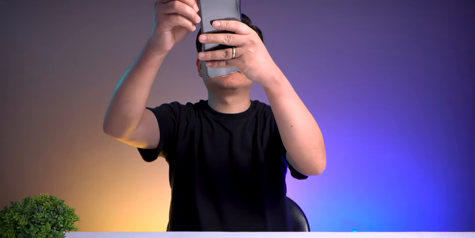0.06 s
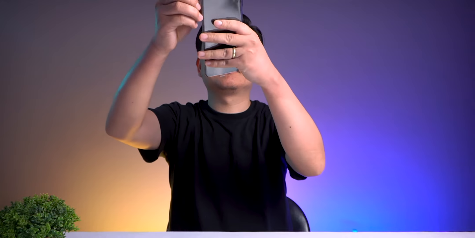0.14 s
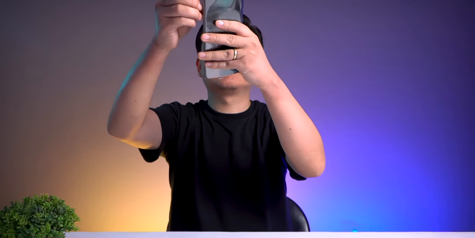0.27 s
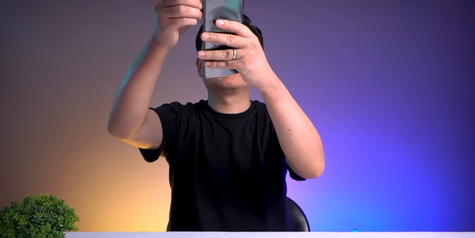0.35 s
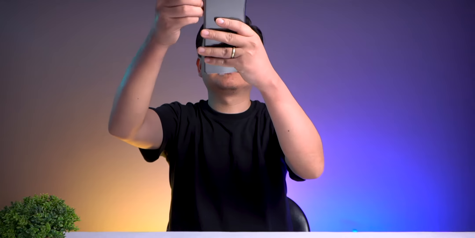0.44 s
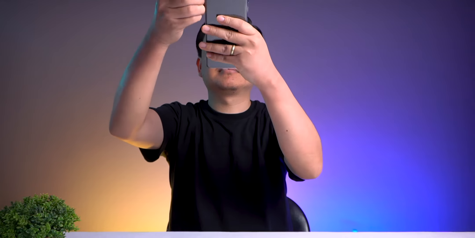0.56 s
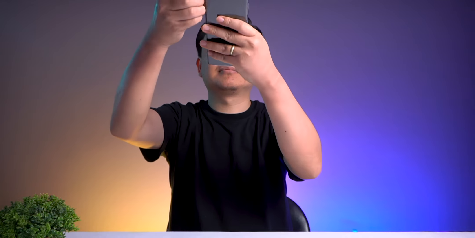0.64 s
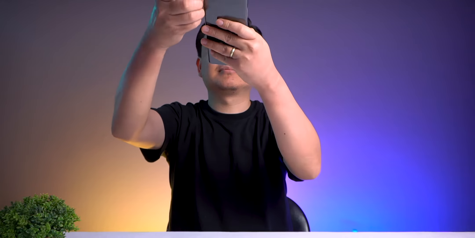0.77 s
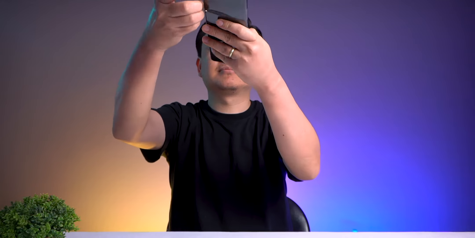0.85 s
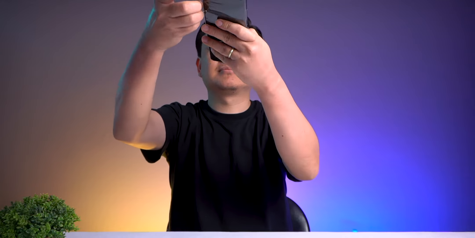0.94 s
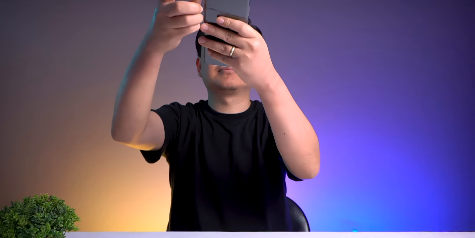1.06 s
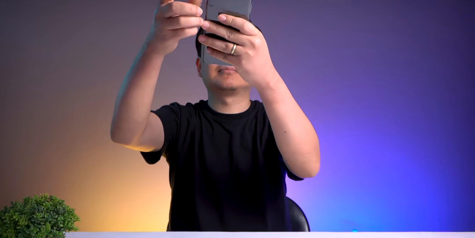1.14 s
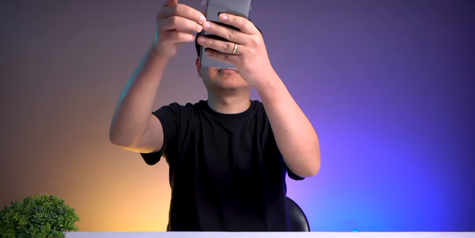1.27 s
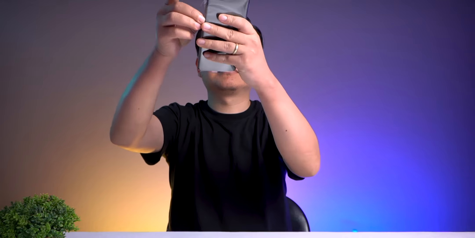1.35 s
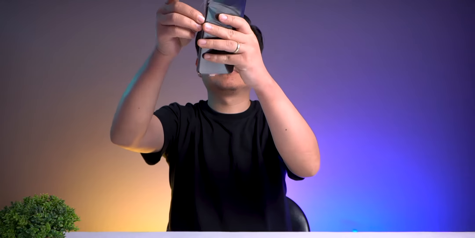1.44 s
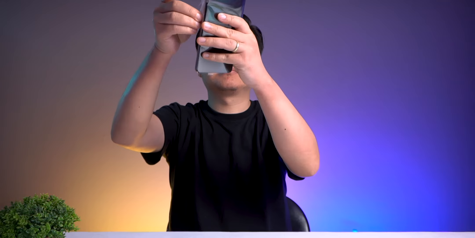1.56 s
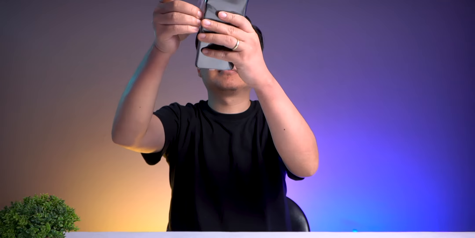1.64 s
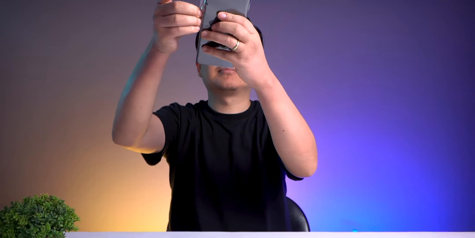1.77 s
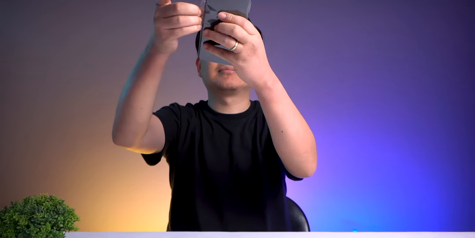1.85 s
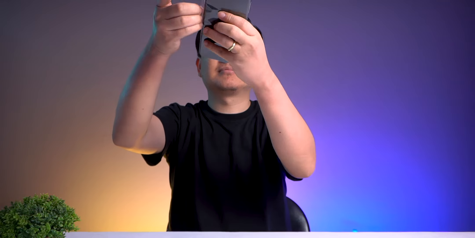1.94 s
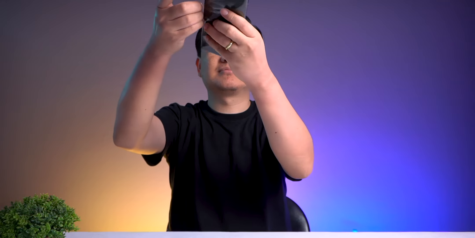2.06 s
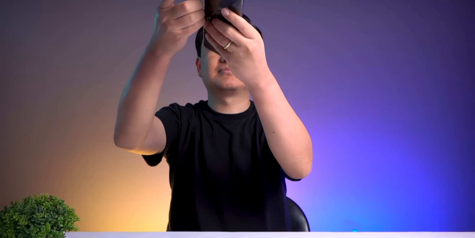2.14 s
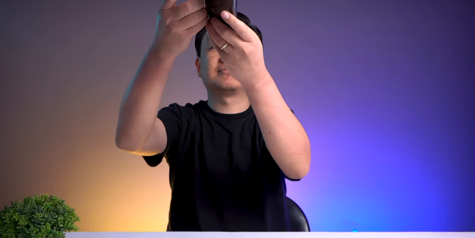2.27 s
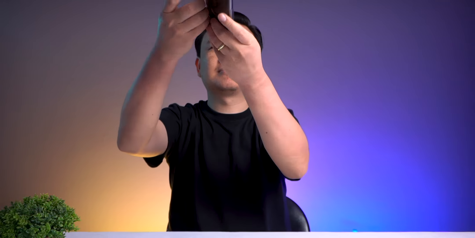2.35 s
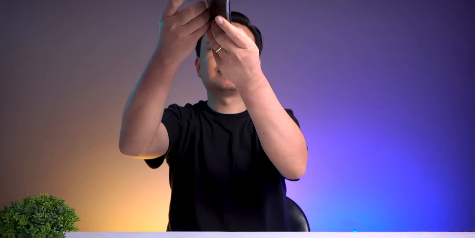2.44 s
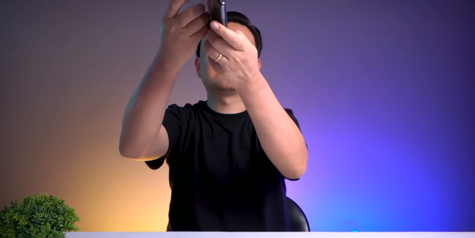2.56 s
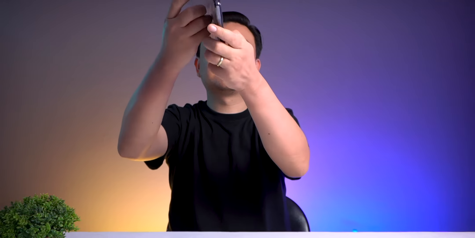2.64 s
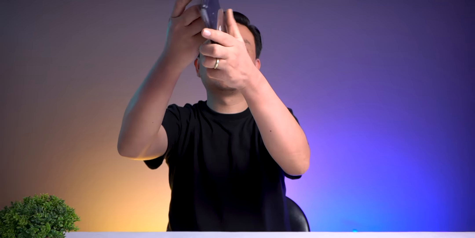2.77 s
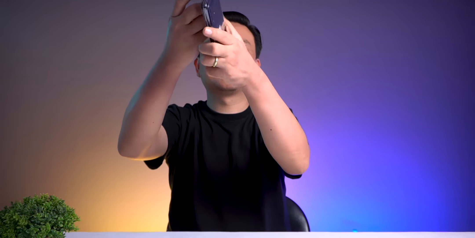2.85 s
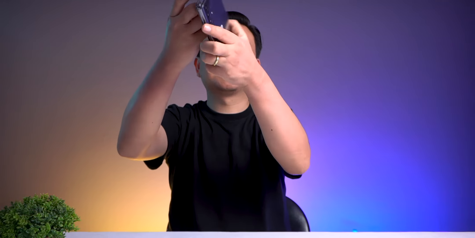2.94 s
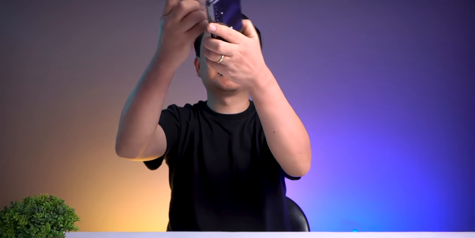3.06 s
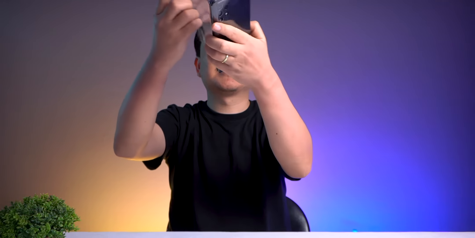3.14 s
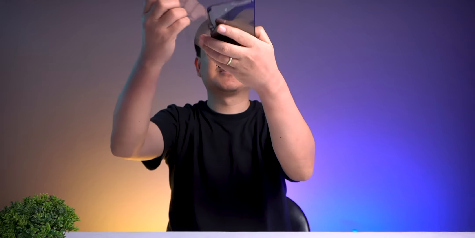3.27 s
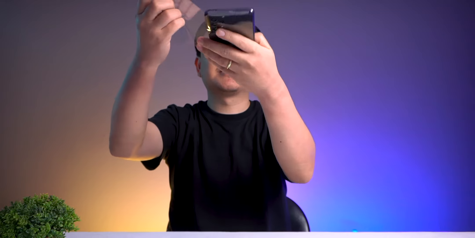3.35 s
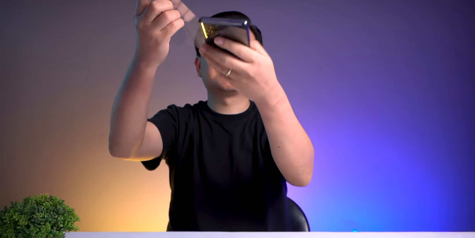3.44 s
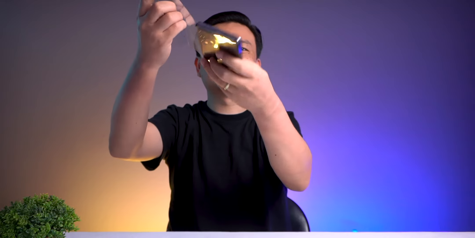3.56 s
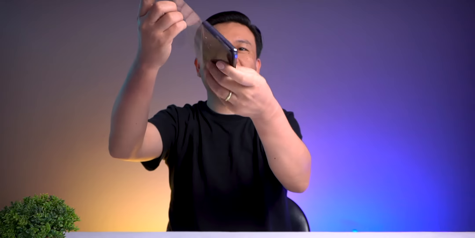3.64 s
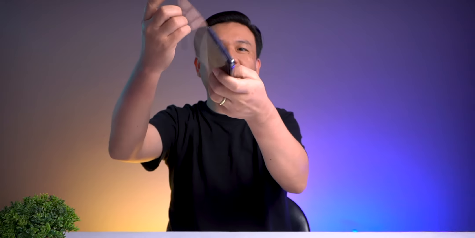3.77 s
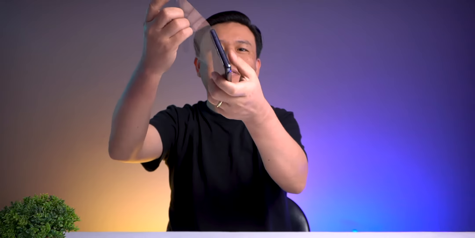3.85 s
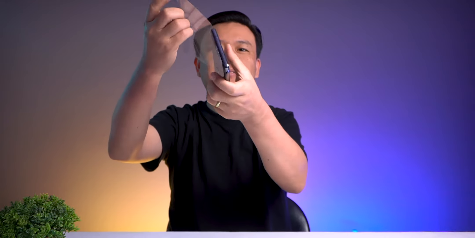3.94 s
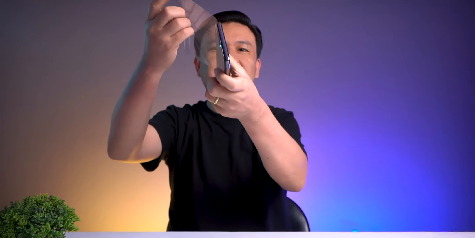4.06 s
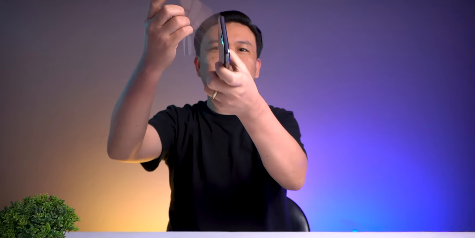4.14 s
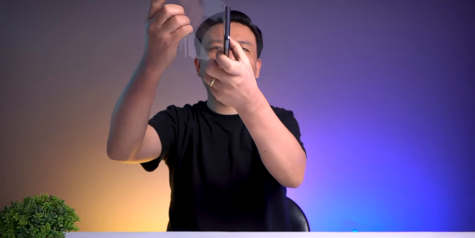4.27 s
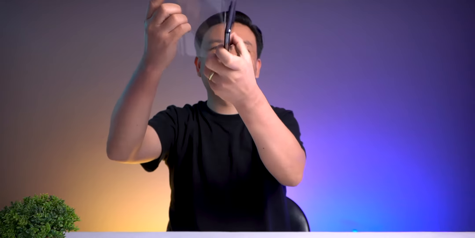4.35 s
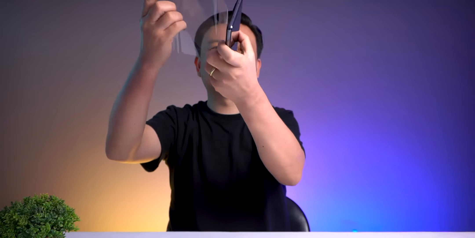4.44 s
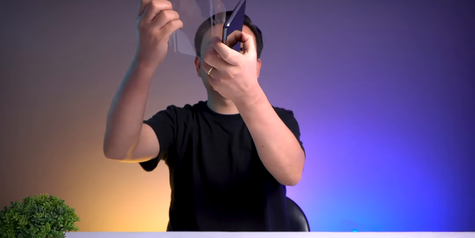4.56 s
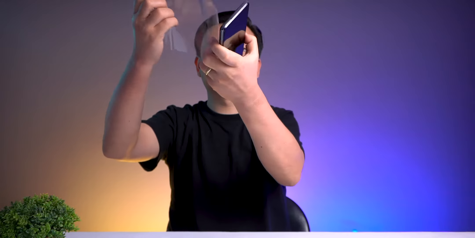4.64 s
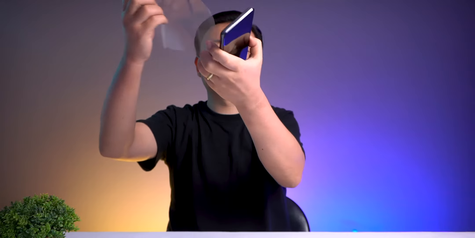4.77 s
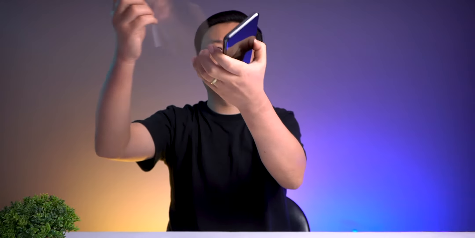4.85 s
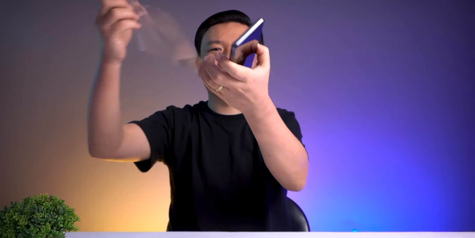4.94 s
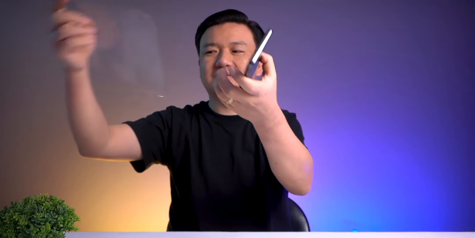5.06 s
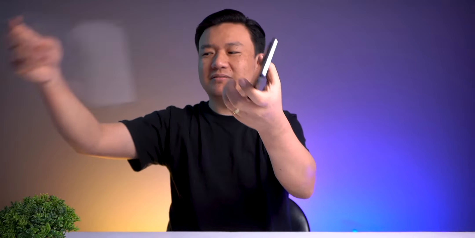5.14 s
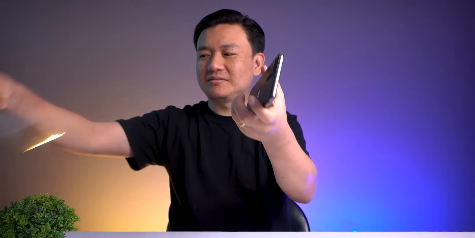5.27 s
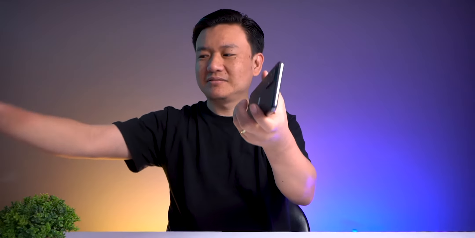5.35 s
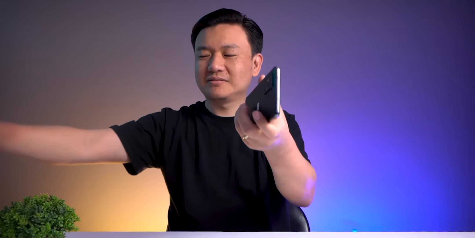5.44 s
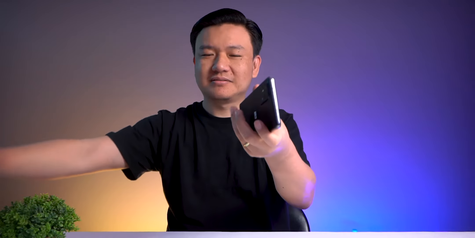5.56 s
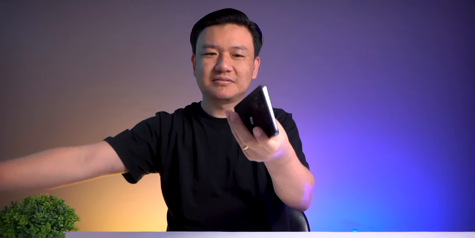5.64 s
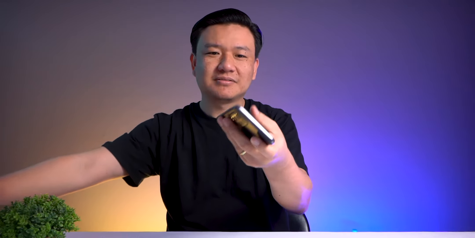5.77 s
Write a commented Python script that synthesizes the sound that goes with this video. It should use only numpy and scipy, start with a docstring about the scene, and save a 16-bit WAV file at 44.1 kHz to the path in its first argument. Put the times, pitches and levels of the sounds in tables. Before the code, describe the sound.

Thin plastic film peels off a phone in sharp, irregular snaps and hissing crinkles, with soft cloth bumps and low rumble close to the microphone.

```python
"""Sharp snaps and short, hissing crinkles, with soft thumps and a low rumble, in a quiet room.
Protective film is peeled off a phone close to a clip-on microphone, and tossed aside at the end.
Creases snap as bursts of tiny slips through resonances; sliding film is noise that catches and frees.
The taut sheet twangs as short tones that rise in pitch. The raised arms drag the shirt over the
microphone: low noise rumbles and rubs, and brief low swings make the bumps."""
import sys
import numpy as np
from scipy import signal
from scipy.fft import rfft, irfft
from scipy.io import wavfile
from scipy.ndimage import uniform_filter1d

SR = 44100
rng = np.random.default_rng(int(sys.argv[2]) if len(sys.argv) > 2 else 0)


def generate_wav(sig):
    """Save sig (samples, or channels by samples) to the path in sys.argv[1] as 16-bit PCM at SR."""
    pcm = np.round(np.clip(np.atleast_2d(sig).T, -1, 1) * 32767).astype(np.int16)
    wavfile.write(sys.argv[1], SR, pcm)


N = 255971  # length of the scene in samples


def from_db(db):
    """Turn decibels into a gain."""
    return 10 ** (np.asarray(db) / 20)


def rms_one(x):
    """Scale to an average power of one."""
    return x / np.sqrt(np.mean(x ** 2) + 1e-20)


def energy_one(x):
    """Scale to a total energy of one."""
    return x / np.sqrt(np.sum(x ** 2) + 1e-20)


def gain_in_time(rows):
    """Draw a gain curve through points of time (s) and level (dB)."""
    time_s, level_db = np.transpose(rows)
    return from_db(np.interp(np.arange(N) / SR, time_s, level_db))


def add(out, start_s, sound):
    """Mix a sound in from its start time, cut off at the end of the scene."""
    first = max(round(start_s * SR), 0)
    out[first:first + len(sound)] += sound[:max(N - first, 0)]


def coloured(x, spectrum):
    """Give x a spectrum that falls steeply beyond its end points, at unit power."""
    hz, db = np.transpose(spectrum)
    f = np.maximum(np.fft.rfftfreq(len(x), 1 / SR), 1)
    skirts = np.minimum(f / hz[0], 1) ** 2 * np.minimum(hz[-1] / f, 1) ** 4
    gain = from_db(np.interp(np.log(f), np.log(hz), db))
    return rms_one(irfft(rfft(x) * skirts * gain, len(x)))


def resonance(x, hz, q):
    """Favour one pitch, as a springy part does; a higher q rings longer (two-pole band-pass)."""
    w = 2 * np.pi * min(hz, SR / 3) / SR
    damp = np.sin(w) / (2 * q)
    return signal.lfilter([damp, 0, -damp], [1 + damp, -2 * np.cos(w), 1 - damp], x)


def stroke(start_s, length_s, attack_s, release_s):
    """Make an envelope that swells up to its start, holds, and dies away."""
    t = np.arange(N) / SR - start_s
    swelling = np.minimum(t / attack_s, 0)
    fading = np.maximum(t - length_s, 0) / release_s
    return np.exp(np.maximum(swelling - fading, -30))


def microphone_hiss(level_db=-63.5):
    """The microphone's own faint, steady noise."""
    # colour of the hiss: f/Hz, level per Hz/dB
    hiss_colour = [(300, 3), (1000, -1), (3000, -2), (8000, 0), (15500, 0)]
    return from_db(level_db) * coloured(rng.standard_normal(N), hiss_colour)


def room(x, build_s=.028, level_db=-24.5, t60_s=.4, treble_hz=9000, treble_t60_s=.25):
    """Echoes blur into a faint tail that builds up and dies away, the highest treble sooner."""
    # colour of the echoes: f/Hz, level/dB
    tail_colour = [(300, -9), (1200, 0), (2500, -2), (5000, 1), (8000, -1), (15000, -7)]
    t = np.arange(SR) / SR
    tail = coloured(rng.standard_normal(SR), tail_colour) * (1 - np.exp(-t / build_s))
    dull = signal.sosfiltfilt(signal.butter(2, treble_hz, fs=SR, output="sos"), tail)
    treble = tail - dull
    tail = dull * from_db(-60 * t / t60_s) + treble * from_db(-60 * t / treble_t60_s)
    return from_db(level_db) * signal.fftconvolve(x, energy_one(tail))[:N]


def shirt(rumble_db=1.5, rub_db=0, resting_rub_db=-56, tug_db=3, tug_s=.07):
    """Cloth pulls at the microphone in uneven tugs and rubs across it, louder in each drag."""
    # handling noise while the arms are raised: t/s, rumble before tugs and rumble_db/dB
    handling = [(0.0, -46), (0.92, -60), (1.55, -47), (1.84, -48), (1.94, -51), (2.26, -46), (2.78, -45),
                (3.2, -36), (3.47, -33), (3.99, -39), (4.2, -38), (4.31, -34), (4.62, -36), (4.7, -35),
                (4.85, -46), (4.94, -49), (5.32, -51), (5.8, -50)]
    # the shirt drags across the microphone: start/s, length/s, level/dB
    drags = [(.09, .03, -40), (.68, .12, -56), (1.03, .03, -46), (1.16, .07, -50), (1.24, .14, -43),
             (1.49, .12, -47), (1.81, .04, -50), (2.22, .05, -49), (2.53, .05, -44), (2.7, .06, -50),
             (3.02, .05, -43), (3.16, .12, -41), (3.465, .05, -50), (3.735, .06, -40), (3.935, .015, -43),
             (3.97, .13, -54), (4.325, .15, -36), (5.508, .07, -51)]
    # colours of the two noises: f/Hz, level per Hz/dB
    rumble_colour = [(20, 5), (55, 0), (125, -7), (210, -22)]
    rub_colour = [(135, 6), (220, 3), (330, -4), (600, -11), (900, -21)]
    attack_s, release_s = .006, .022

    rumble = gain_in_time(handling)
    unevenness = rms_one(uniform_filter1d(rng.standard_normal(N), int(tug_s * SR)))
    tugs = from_db(tug_db * unevenness)
    rub_power = from_db(resting_rub_db) ** 2  # the cloth rubs faintly throughout
    for start_s, length_s, db in drags:
        rub_power = rub_power + (from_db(db) * stroke(start_s, length_s, attack_s, release_s)) ** 2
    rumbling = from_db(rumble_db) * rumble * tugs * coloured(rng.standard_normal(N), rumble_colour)
    rubbing = from_db(rub_db) * np.sqrt(rub_power) * coloured(rng.standard_normal(N), rub_colour)
    return rumbling + rubbing


def bumps(rise=.5, fall=.9, level_db=1.3, scuff_db=-15):
    """Soft contact swings the microphone to and fro briefly, and scuffs it meanwhile."""
    # bumps: t of the middle/s, level before level_db/dB, f/Hz, half length/swings
    contacts = [(.102, -6, 66, .44), (.521, -15, 195, .32), (1.056, -31, 150, .5), (1.542, -11, 193, .27),
                (1.676, -26, 71, .36), (1.828, -19, 91, .62), (2.244, -16, 105, .4), (2.343, -23, 60, .55),
                (2.538, -16, 146, .39), (2.552, -21, 70, .42), (2.7, -29, 220, .88), (2.744, -12, 73, .34),
                (2.766, -17, 50, .3), (2.967, -21, 79, .35), (3.03, -8, 117, .48), (3.048, -14, 98, .35),
                (3.118, -22, 75, .45), (3.155, -21, 153, .69), (3.181, -16, 236, .26), (3.221, -17, 80, .4),
                (3.359, -17, 40, .79), (3.453, -18, 61, .8), (3.468, -25, 190, .76), (3.49, -21, 70, .7),
                (3.545, -23, 68, 1.2), (3.625, -26, 68, 1.5), (3.696, -22, 154, .32), (3.797, -16, 110, .7),
                (3.815, -14, 80, .5), (3.838, -16, 70, .6), (3.953, -13, 47, .52), (4.135, -7, 69, .85),
                (4.326, -25, 230, .46), (4.379, -18, 98, .51), (4.54, -17, 26, .9), (4.446, -15, 57, .36),
                (4.479, -17, 45, .54), (4.748, -12, 50, .7), (4.805, -22, 55, 1.0)]
    # colour of cloth scuffed by a bump: f/Hz, level per Hz/dB
    scuff_colour = [(200, -2), (320, 0), (550, -12), (950, -29)]
    out, lead_s = np.zeros(N), .08
    t = np.arange(SR // 4) / SR - lead_s  # zero in the middle of the bump
    for middle_s, db, hz, swings in contacts:
        half_s = swings / hz
        swell = 2 * np.exp(-np.logaddexp(-t / (rise * half_s), t / (fall * half_s)))
        scuff = coloured(rng.standard_normal(len(t)), scuff_colour)
        # quick contacts scuff most; slow ones are smooth thuds
        quickness = min(.002 / half_s, 1) ** 1.5
        swing = from_db(scuff_db) * quickness * scuff - np.sin(2 * np.pi * hz * t)
        add(out, middle_s - lead_s, from_db(db + level_db) * swell * swing)
    return out


def faint_ticks(per_s=24, energy_db=-31, spread_db=4, start_s=1.35, end_s=3.8):
    """Small creases give way at random under the fingertips while the film is worked loose."""
    out, t = np.zeros(N), np.arange(256) / SR
    span_s = end_s - start_s
    for when, size, pitch in rng.random((int(per_s * span_s), 3)):
        slip = rng.standard_normal(len(t)) * np.exp(-t / .0006)
        tick = energy_one(resonance(slip, 2500 * 4 ** pitch, 1))  # 2500 to 10000 Hz
        gain = from_db(energy_db + spread_db * (2 * size - 1))
        add(out, start_s + when * span_s, gain * tick)
    return out


def twangs():
    """The plucked sheet sounds like a small drum, and rises in pitch as it is pulled tighter."""
    # twangs: t/s, level before fading/dB, f at the start/Hz, time to fade by 60 dB/s,
    # rise in pitch as a share of f/per s
    plucks = [(.492, -33, 415, .09, 4), (.520, -31, 420, .12, .3), (.520, -33, 715, .06, 8),
              (.519, -35, 1050, .04, .3), (3.178, -21, 470, .03, .3), (4.1615, -5, 98, .17, 1.8)]
    out, t = np.zeros(N), np.arange(SR // 4) / SR
    for start_s, db, hz, t60_s, rise in plucks:
        build_up = np.tanh(np.pi * hz * t)  # within a cycle
        envelope = build_up * from_db(db - 60 * t / t60_s)
        add(out, start_s, envelope * np.sin(2 * np.pi * hz * t * (1 + rise * t / 2)))
    return out


def sliding_film(flutter_db=-.6, crinkle_db=.3, hiss_db=-1, catch_db=2.6, catch_s=.003):
    """Countless tiny slips blur into noise that catches and frees; the sheet rings, then settles."""
    # strokes in which the film slides or flexes: start/s, length/s, level/dB, crinkle f/Hz,
    # then against that level and before the trims above: papery flutter/dB, glue hiss/dB;
    # last, the settling rustle against the stroke/dB
    pulls = [(0.81, 0.025, -50, 6500, -22, -2, -16), (0.9, 0.075, -52, 7000, -30, -12, -8),
             (0.987, 0.077, -48, 5000, -5, -5, -13), (1.357, 0.06, -47, 7000, -18, -2, -4),
             (1.545, 0.04, -44, 5600, -20, -18, -4), (1.601, 0.058, -41, 5600, -12, -8, -5),
             (1.802, 0.06, -54, 4500, 1, -6, -10), (1.969, 0.02, -53, 4000, 1, -6, -14),
             (2.1, 0.04, -54, 6500, -11, -9, -6), (2.385, 0.05, -48, 4500, -10, -5, -1),
             (2.534, 0.039, -45, 5500, -3, -6, -8), (2.93, 0.2, -64, 6000, -8, -3, -3),
             (3.179, 0.03, -57, 5000, 5, -4, -6), (3.358, 0.02, -56, 6500, -10, 0, -20),
             (3.68, 0.08, -64, 5500, 0, -3, -14), (4.225, 0.03, -49, 5600, -20, -18, -5),
             (4.34, 0.06, -40, 5000, -7, -9, -2), (4.55, 0.025, -53, 5200, -10, -9, -14),
             (4.68, 0.04, -50, 5000, -12, -4, -12), (4.727, 0.035, -38, 6500, -15, -2, -24),
             (4.792, 0.04, -58, 5500, -12, -4, -21), (5.504, 0.074, -53, 5500, -4, -5, -5),
             (5.628, 0.037, -51, 6000, -20, 1, -6), (5.724, 0.093, -60, 5000, -2, -6, -14)]
    # colours of the flutter and the glue hiss: f/Hz, level per Hz/dB
    flutter_colour = [(500, -2), (1300, 1), (2400, -2), (3600, -14)]
    hiss_colour = [(6500, -12), (8700, 0), (12000, -3), (16000, -10)]
    attack_s, release_s = .005, .012
    crinkle_q = .95  # sharpness of the crinkle's resonance
    settle_db_per_s = 72  # after a stroke the sheet rustles on and dies away
    settle_hiss_db = -7  # the settling rustle is duller than the stroke

    unevenness = rms_one(uniform_filter1d(rng.standard_normal(N), int(catch_s * SR)))
    catching = from_db(catch_db * unevenness)
    friction = catching * rng.standard_normal((3, N))
    flutter = from_db(flutter_db) * coloured(friction[0], flutter_colour)
    hiss = from_db(hiss_db) * coloured(friction[1], hiss_colour)
    out, t = np.zeros(N), np.arange(N) / SR
    for start_s, length_s, db, hz, flutter_share_db, hiss_share_db, settle_db in pulls:
        since_s = t - start_s - length_s  # time since the stroke ended
        pulling = stroke(start_s, length_s, attack_s, release_s)
        settling = (since_s > 0) * from_db(settle_db - settle_db_per_s * np.abs(since_s))
        ringing = resonance(resonance(friction[2], hz, crinkle_q), hz, crinkle_q)
        crinkle = from_db(crinkle_db) * rms_one(ringing)
        papery = crinkle + from_db(flutter_share_db) * flutter
        glue = from_db(hiss_share_db) * hiss
        glue_envelope = np.maximum(pulling, from_db(settle_hiss_db) * settling)
        out += from_db(db) * (np.maximum(pulling, settling) * papery + glue_envelope * glue)
    return out


def snaps(first_slip=1.6, ring_db=-20, ring_t60_s=.02, body_low_hz=400, body_high_hz=2700,
          crack_db=-12, unevenness=2.2):
    """A crease flips: a hard slip, a quick run of smaller ones, then the sheet rings briefly."""
    # snapping creases and flaps of the sheet: t/s, energy of the bright part/dB, f/Hz,
    # sharpness Q, dull body against the bright part/dB, time for the slips to fade by 30 dB/s
    creases = [(0.0415, -3, 4400, 0.5, -11, 0.0014), (0.0589, -2, 3400, 0.4, 2, 0.008),
               (0.0862, -10, 5400, 0.7, -14, 0.0011), (0.0984, -8, 8400, 0.8, -9, 0.0015),
               (0.2019, -11, 8200, 0.6, -21, 0.0014), (0.2555, -20, 10000, 1, -30, 0.015),
               (0.2675, -25, 4200, 0.6, -14, 0.002), (0.351, -3, 6000, 0.5, -18, 0.0018),
               (0.4119, -10, 9100, 0.7, -18, 0.0011), (0.417, -3, 7400, 0.6, -23, 0.001),
               (0.4226, -2, 7000, 0.9, -26, 0.0016), (0.4915, -7, 5900, 0.6, -9, 0.01),
               (0.5185, 1, 8500, 0.4, -8, 0.007), (0.5736, -13, 9300, 0.7, -26, 0.011),
               (0.7754, -9, 8700, 0.8, -17, 0.001), (0.7971, 0, 5400, 1.2, -25, 0.0015),
               (0.8112, -12, 8000, 0.4, -14, 0.003), (0.8264, -8, 8100, 0.4, -30, 0.008),
               (0.8374, -10, 8000, 0.5, -16, 0.004), (0.8606, -3, 6900, 0.6, -16, 0.001),
               (0.8964, -1, 5800, 1.0, -22, 0.0015), (0.9449, -4, 6800, 0.4, -14, 0.0011),
               (0.9879, 1, 6300, 0.4, -16, 0.002), (1.0479, -6, 5500, 0.5, -4, 0.006),
               (1.056, -1, 4000, 0.6, -3, 0.0085), (1.3543, -2, 5900, 0.7, -18, 0.0018),
               (1.404, -10, 5200, 0.4, -9, 0.0027), (1.4182, -12, 9500, 0.7, -22, 0.008),
               (1.4942, -13, 6000, 0.6, -24, 0.008), (1.53, -13, 7000, 0.6, -16, 0.007),
               (1.5413, -7, 4700, 0.6, -2, 0.003), (1.5489, 1, 4700, 0.8, -27, 0.004),
               (1.594, 1, 7000, 0.4, -13, 0.0065), (1.6233, 0, 5800, 0.3, -30, 0.0025),
               (1.6764, -9, 5800, 0.6, -14, 0.002), (1.7876, -3, 8200, 0.4, -22, 0.0018),
               (1.8044, -12, 6000, 0.4, -17, 0.001), (1.8197, -7, 6000, 0.4, -12, 0.002),
               (1.8221, -4, 4400, 0.3, -26, 0.0025), (1.8374, -2, 3600, 0.4, -28, 0.0017),
               (1.8438, -6, 6800, 0.7, -20, 0.0014), (1.8651, -10, 5200, 0.3, -20, 0.0015),
               (1.8743, -11, 6500, 0.6, -13, 0.001), (1.882, -18, 2400, 0.5, -12, 0.002),
               (1.9662, -16, 8500, 0.5, -6, 0.002), (1.9727, -4, 5500, 0.8, -1, 0.004),
               (1.9777, -4, 2100, 0.4, -30, 0.0046), (1.9866, 0, 2800, 0.4, -29, 0.0027),
               (2.0686, -3, 10200, 0.5, -15, 0.0017), (2.0795, -17, 4500, 0.6, -18, 0.002),
               (2.0971, 2, 6400, 0.7, -20, 0.0024), (2.1593, -3, 6300, 0.3, -12, 0.001),
               (2.195, -9, 8000, 0.5, -14, 0.001), (2.2087, -6, 8100, 0.5, -15, 0.001),
               (2.2162, -8, 11500, 0.3, -26, 0.002), (2.2435, -5, 7400, 0.3, -13, 0.002),
               (2.2467, -7, 7800, 0.5, -16, 0.002), (2.2755, -5, 5900, 0.6, -15, 0.001),
               (2.3297, -10, 7500, 0.5, -10, 0.0014), (2.3425, -7, 4300, 0.6, -1, 0.0022),
               (2.3507, -2, 7500, 0.5, -17, 0.001), (2.3714, -11, 7900, 0.5, -11, 0.0012),
               (2.3795, -3, 6000, 0.5, -17, 0.001), (2.3816, -2, 7600, 0.4, -18, 0.001),
               (2.4465, -16, 7500, 0.7, -24, 0.0011), (2.4937, -1, 9000, 0.3, -21, 0.008),
               (2.5282, -6, 9400, 0.5, -18, 0.008), (2.5339, 6, 6200, 0.5, -11, 0.012),
               (2.5439, -3, 4700, 0.5, -4, 0.011), (2.5783, -4, 3400, 0.4, -9, 0.0018),
               (2.6955, -19, 5000, 0.5, -14, 0.002), (2.7462, -12, 3200, 1.4, 1, 0.0015),
               (2.8278, -11, 4500, 0.4, -14, 0.003), (3.026, -15, 700, 1.9, -3, 0.004),
               (3.1461, -20, 4300, 0.5, -6, 0.005), (3.1773, -1, 800, 0.5, -25, 0.001),
               (3.1775, -3, 2850, 3, -22, 0.001), (3.1842, -14, 4500, 0.7, -1, 0.002),
               (3.1963, -15, 4400, 0.6, -8, 0.0011), (3.2175, -19, 1500, 0.9, -12, 0.003),
               (3.2344, -20, 9100, 0.6, -4, 0.0015), (3.2518, -19, 8300, 0.8, -5, 0.0017),
               (3.2906, -20, 5000, 1.6, 3, 0.0025), (3.3543, -1, 4700, 0.4, -3, 0.003),
               (3.459, -25, 3700, 0.7, -1, 0.005), (3.6929, -3, 4900, 0.7, -5, 0.0015),
               (3.846, -27, 3600, 0.5, -6, 0.003), (4.1846, -2, 4500, 1.0, -19, 0.0019),
               (4.225, -3, 4700, 0.7, -14, 0.007), (4.3254, -15, 2900, 1.7, 3, 0.0034),
               (4.3337, -2, 6200, 0.5, -9, 0.004), (4.3452, -1, 5900, 0.5, -13, 0.0024),
               (4.3518, -3, 6900, 0.5, -16, 0.002), (4.3587, -2, 7100, 0.5, -17, 0.012),
               (4.3691, 1, 5600, 0.3, -16, 0.009), (4.4732, -1, 4200, 0.8, -14, 0.007),
               (4.6024, -15, 3300, 1.1, -8, 0.004), (4.7053, -5, 3900, 0.5, -19, 0.0017),
               (4.836, -16, 5000, 1, -20, 0.006), (4.9916, -25, 3500, 0.5, -1, 0.025),
               (5.19, -26, 5400, 0.5, -1, 0.025), (5.5063, -22, 5000, 0.5, -6, 0.006),
               (5.508, -12, 850, 1, -25, 0.2), (5.6318, -14, 7900, 0.3, -14, 0.008),
               (5.757, -20, 1500, 0.5, -10, 0.04)]
    out, t = np.zeros(N), np.arange(8192) / SR
    body_band = signal.butter(1, [body_low_hz, body_high_hz], "band", fs=SR, output="sos")
    for start_s, db, hz, q, body_db, fade_s in creases:
        run, ring = rng.standard_normal((2, len(t)))
        # the power makes a few slips stand out from many small ones
        uneven_run = np.sign(run) * np.abs(run) ** unevenness
        slips = energy_one(uneven_run * from_db(-30 * t / fade_s))
        # short snaps are almost a single slip, long ones a tear of many
        slips[0] = first_slip * .0015 / fade_s
        ringing = energy_one(ring * from_db(-60 * t / ring_t60_s))
        push = slips + from_db(ring_db) * ringing
        facet = energy_one(resonance(resonance(push, hz, q), hz, q))
        body = energy_one(signal.sosfilt(body_band, push))
        # small, high-pitched facets pass on more of the bare crack of the slip
        crack = from_db(crack_db) * (hz / 6000) ** 2 * energy_one(np.diff(push, prepend=0))
        add(out, start_s, from_db(db) * (facet + from_db(body_db) * body + crack))
    return out


def scene():
    """Mix the film and its echoes with the shirt, the bumps and the microphone's hiss."""
    film = snaps() + faint_ticks() + twangs()
    hiss = microphone_hiss()
    return (film + room(film) + sliding_film() + bumps() + shirt() + hiss)[None]


def record(dry, top=.8, cutoff_hz=16200):
    """Round off the tallest peaks and cut the highest treble."""
    low_pass = signal.ellip(10, .2, 80, cutoff_hz, fs=SR, output="sos")
    rounded = top * np.tanh(dry / top)
    return signal.sosfilt(low_pass, rounded)


dry = scene()
out = record(dry)
generate_wav(out)
```